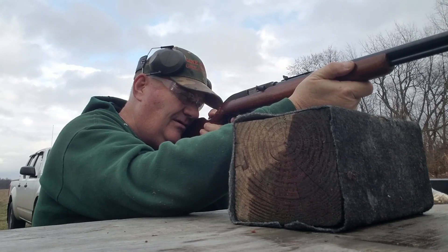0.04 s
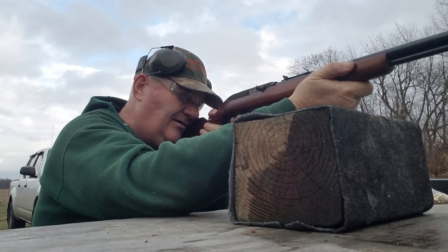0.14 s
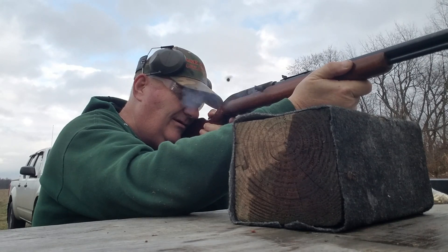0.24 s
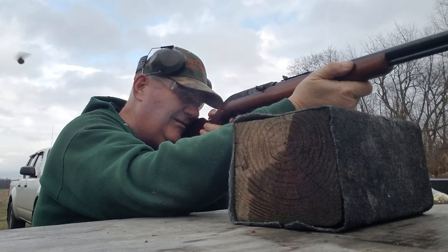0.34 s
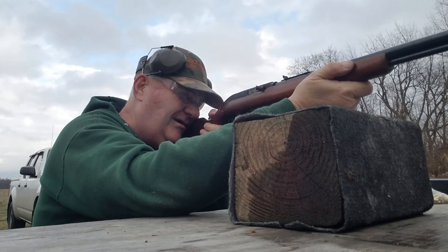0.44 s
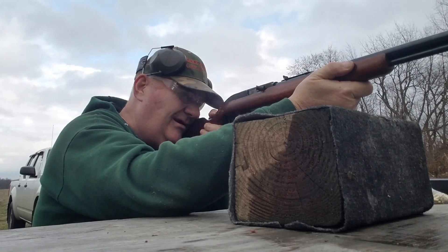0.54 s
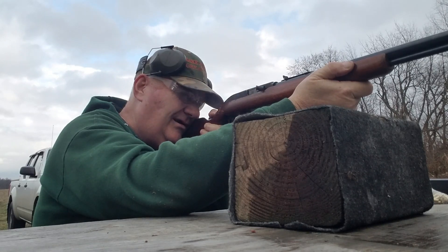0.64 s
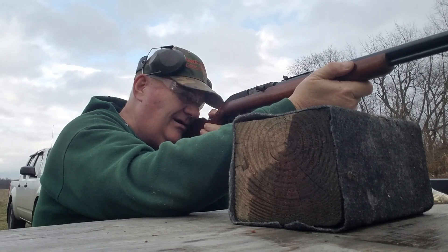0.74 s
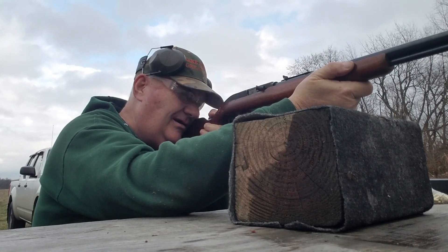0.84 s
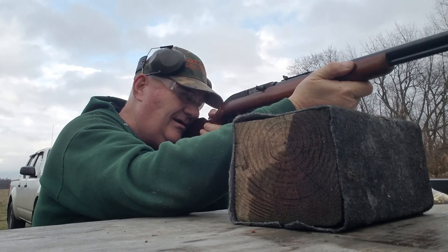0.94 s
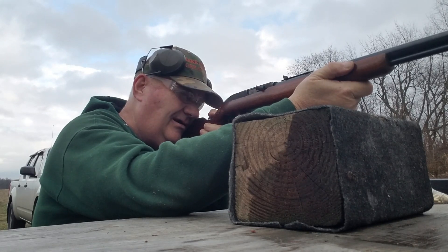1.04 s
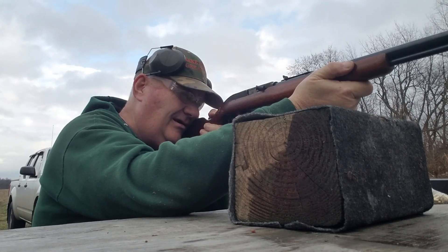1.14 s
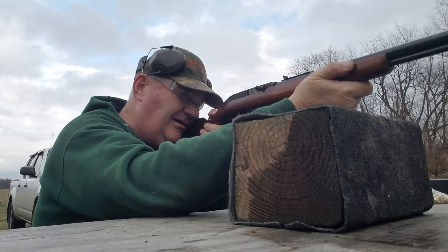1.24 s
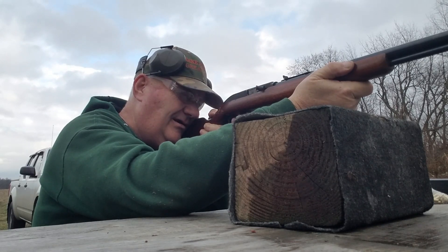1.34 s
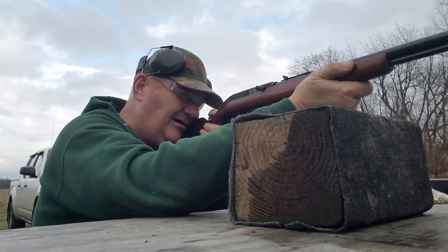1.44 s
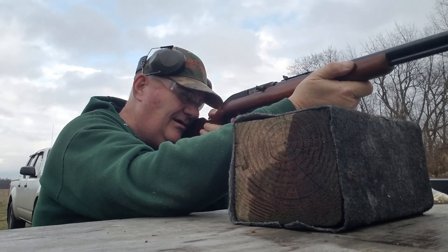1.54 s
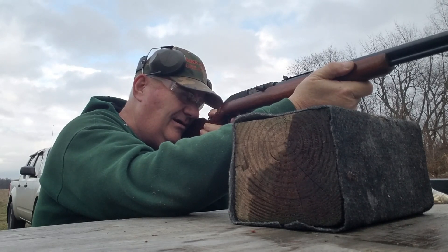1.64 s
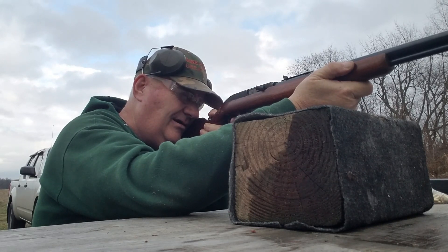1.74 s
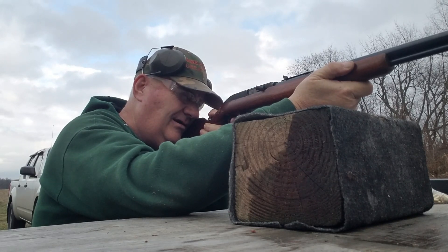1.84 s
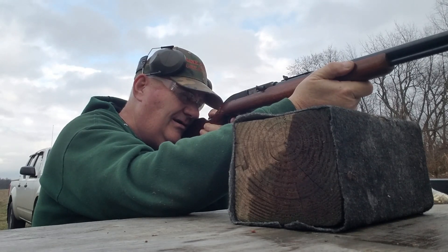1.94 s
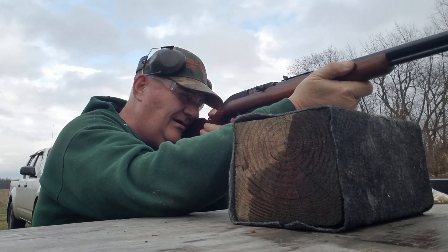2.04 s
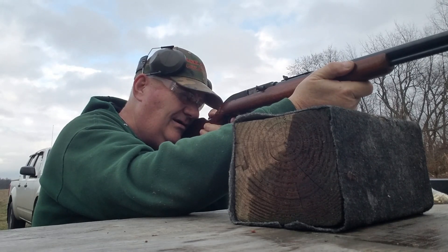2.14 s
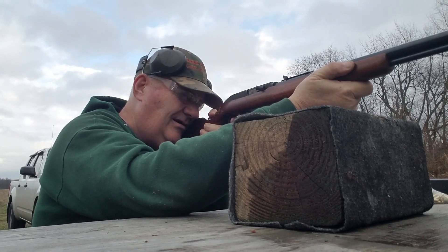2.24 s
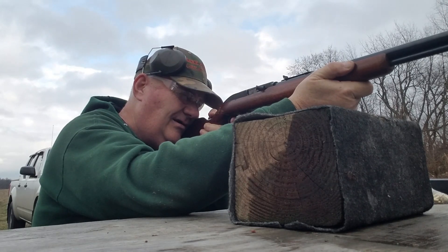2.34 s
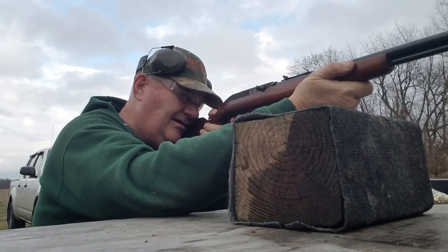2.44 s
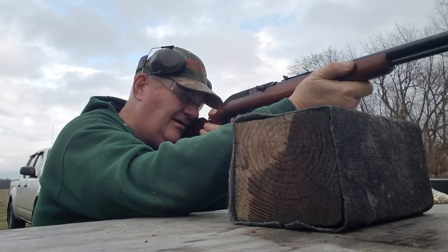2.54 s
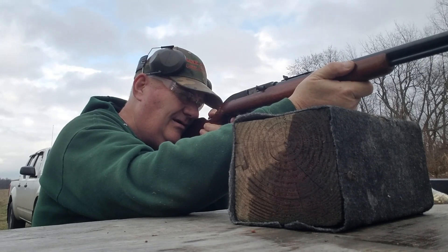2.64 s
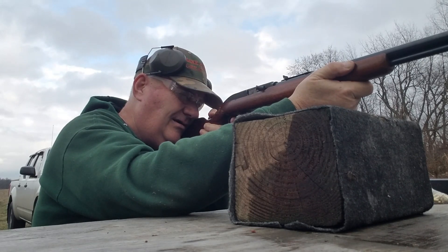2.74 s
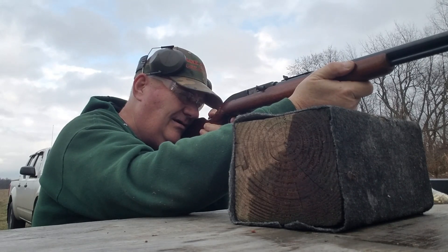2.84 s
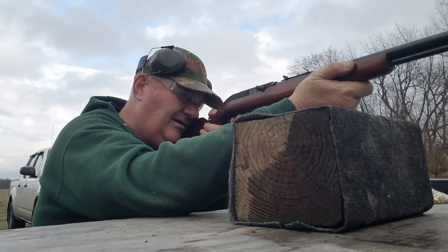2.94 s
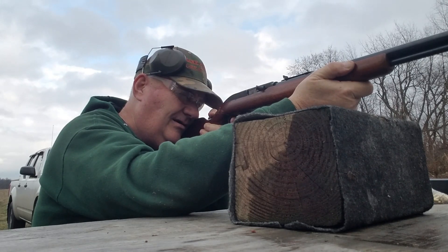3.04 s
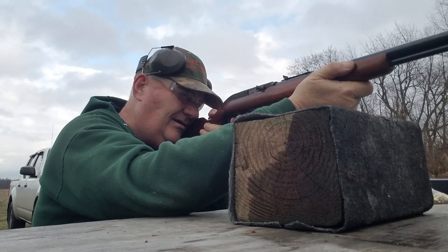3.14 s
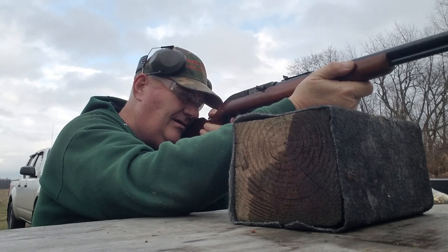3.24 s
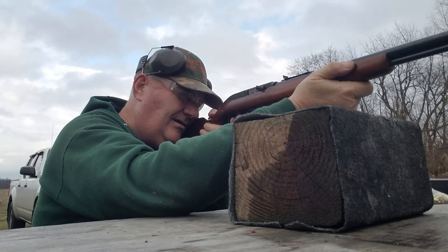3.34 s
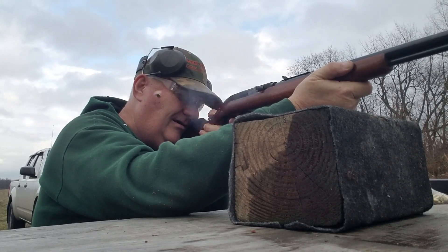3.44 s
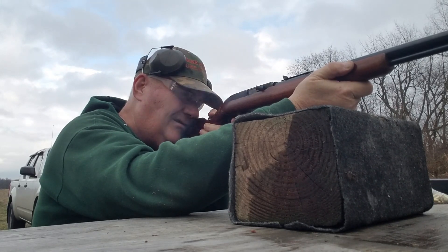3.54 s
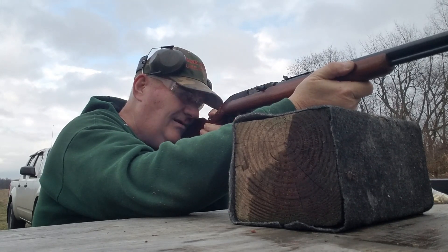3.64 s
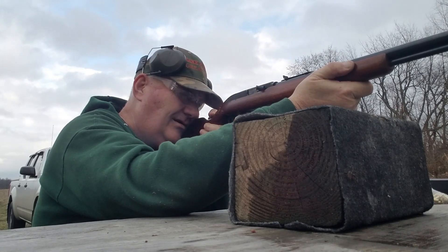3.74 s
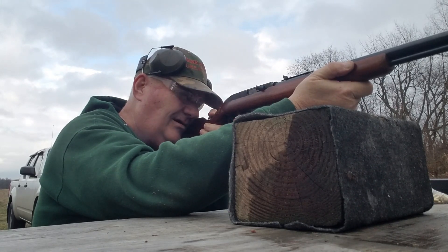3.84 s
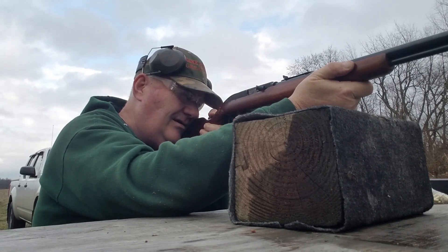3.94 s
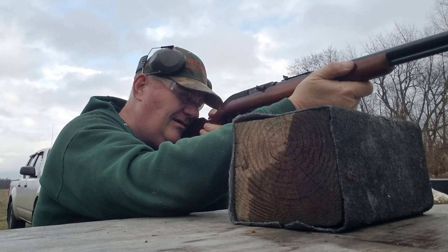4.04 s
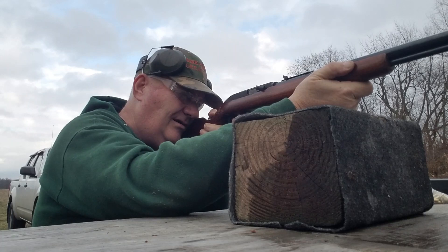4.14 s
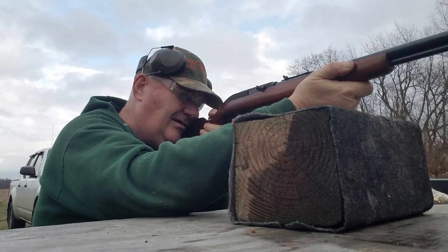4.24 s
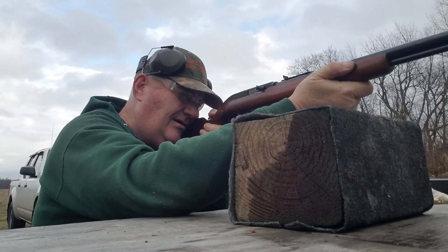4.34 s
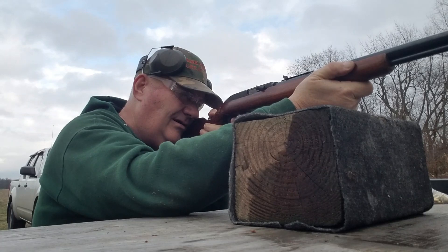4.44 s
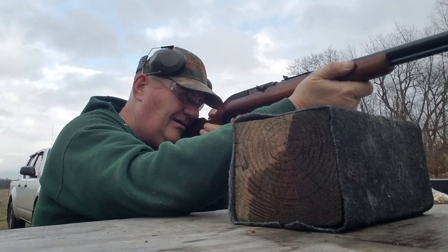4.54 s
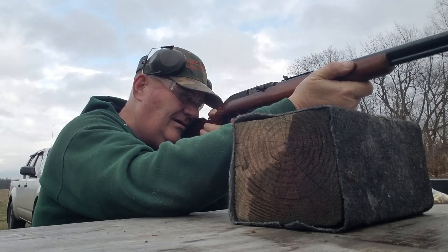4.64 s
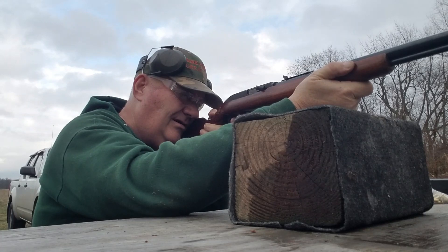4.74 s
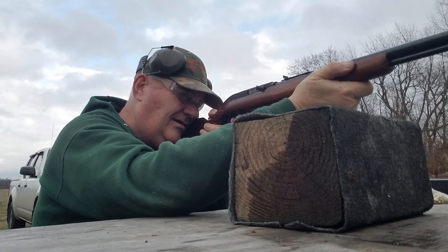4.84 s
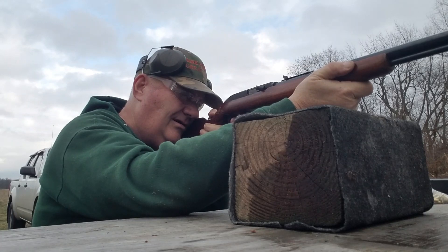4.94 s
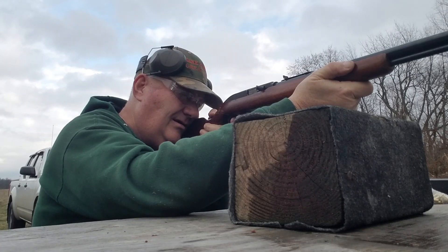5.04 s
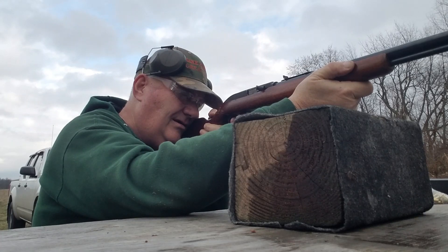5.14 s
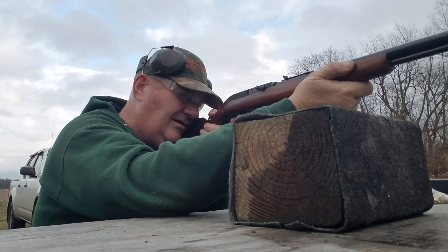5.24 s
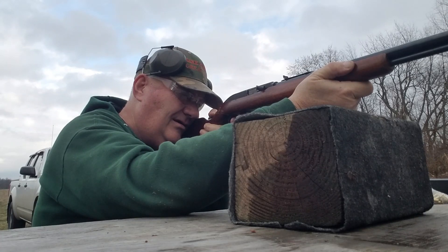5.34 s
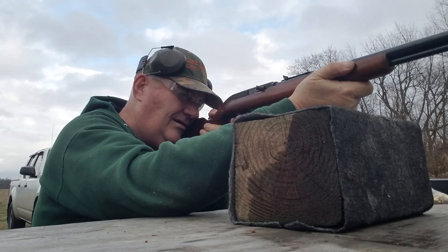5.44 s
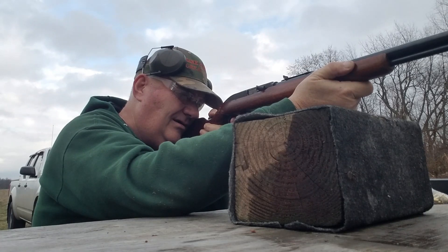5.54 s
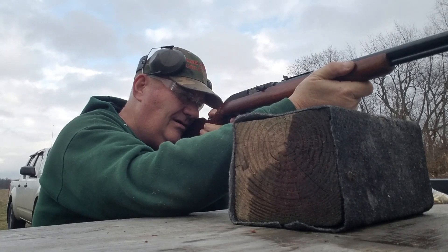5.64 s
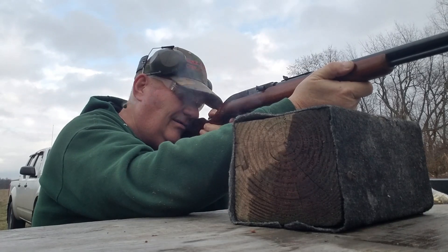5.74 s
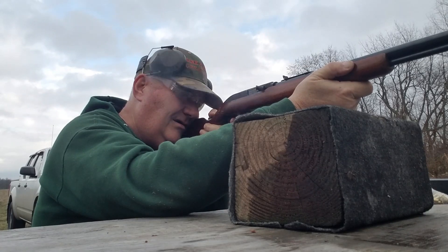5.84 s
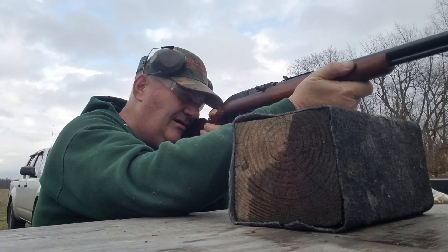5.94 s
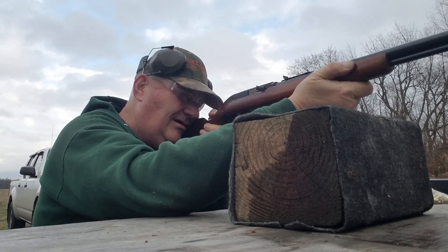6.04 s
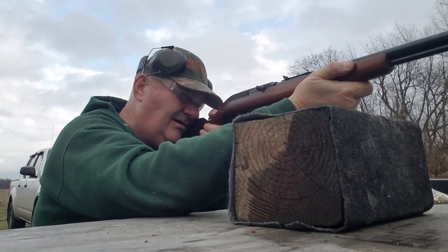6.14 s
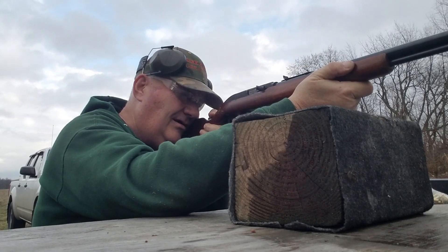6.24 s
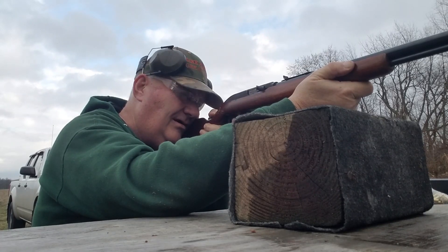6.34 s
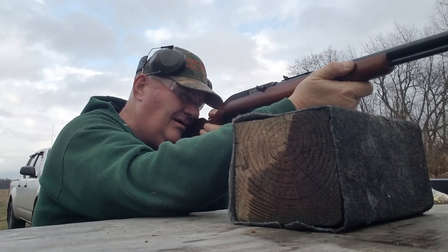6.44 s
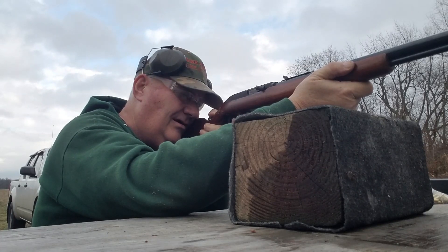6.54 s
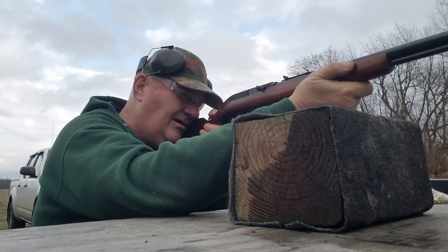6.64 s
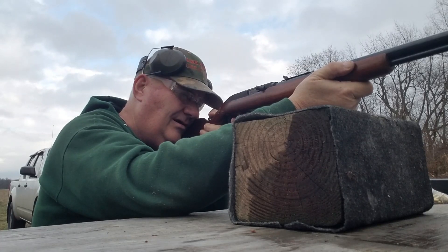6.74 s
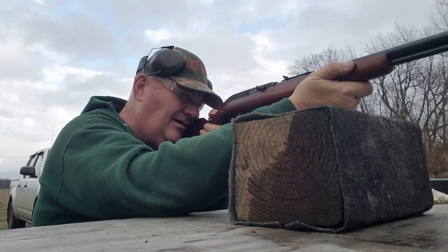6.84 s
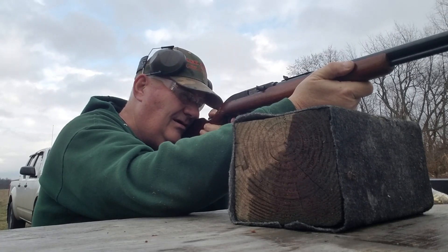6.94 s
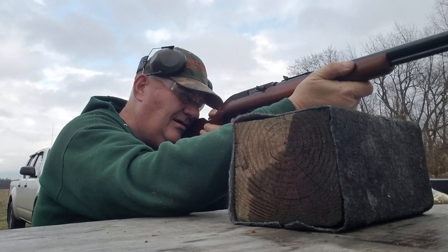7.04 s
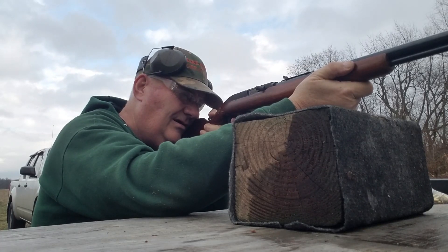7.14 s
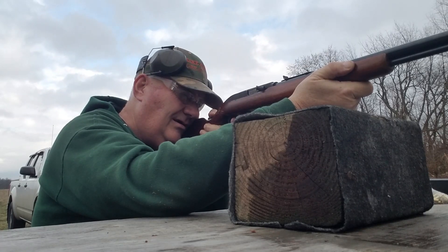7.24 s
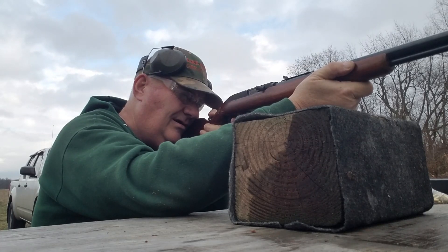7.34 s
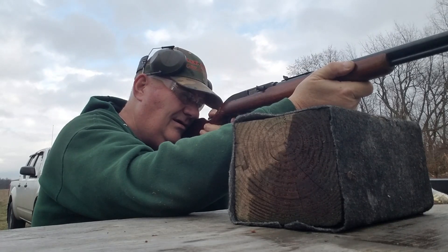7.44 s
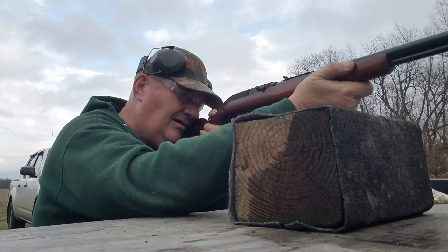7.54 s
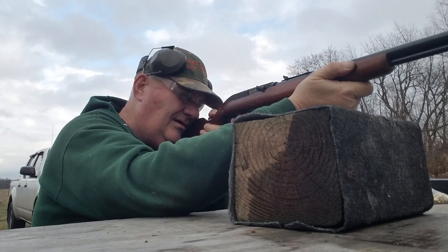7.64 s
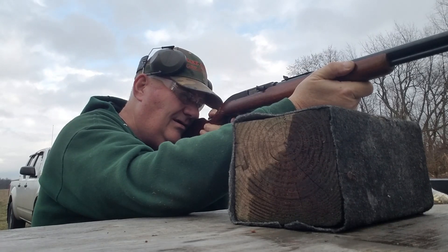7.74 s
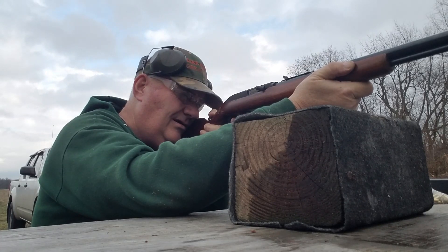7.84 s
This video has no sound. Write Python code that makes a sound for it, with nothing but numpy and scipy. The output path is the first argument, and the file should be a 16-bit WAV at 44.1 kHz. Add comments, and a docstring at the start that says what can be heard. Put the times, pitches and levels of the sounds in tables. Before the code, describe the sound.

Three spaced small-calibre rifle shots outdoors, each a harsh overloaded double crack with bolt clack, woodland echo and brass case ticking on a bench.

```python
"""Three rifle shots from a bench

A small-calibre self-loading rifle is fired in open country, close to two spaced microphones, which it overloads.
Blast, bolt clacks and the cracks that follow are shock fronts with dense pulse clusters, coloured by filters.
A wood answers with noise that dies away band by band; recoil sets off a decaying mode of the wooden bench.
The spent brass case bounces there as filtered contact noise and ringing modes. Filtered noise forms the
open-air floor, a gust of wind at the start and the low rumble of far traffic."""
import sys
import numpy as np
from scipy import signal
from scipy.fft import rfft, irfft
from scipy.io import wavfile

SR = 44100
rng = np.random.default_rng(int(sys.argv[2]) if len(sys.argv) > 2 else 0)


def generate_wav(signal):
    """Clip the signal to [-1, 1] and save it as 16-bit WAV at the path in sys.argv[1]."""
    frames = np.transpose(np.atleast_2d(signal))
    scaled = np.clip(frames, -1, 1) * 32767
    pcm = np.round(scaled).astype(np.int16)
    wavfile.write(sys.argv[1], SR, pcm)


N = 348390   # samples

# The three shots, all levels ahead of the gain control. near_decay_factor stretches the decay of the near trees.
# start_s, blast_db, extra_bass_db, blast_held_ms, bench_thump_db, wash_db, wash_treble_db, near_decay_factor
SHOTS = [(0.2629, -2, 7, 8.5, -16, -25, -2.5, 1.03), (3.4031, -2.5, -7, 6.6, -32, -24.5, 1, 1.05),
         (5.6762, -4, -6.5, 10, -27, -26.5, 2, .9)]
LEFT_LEADS = 20   # samples by which shared sound reaches the left microphone first
BASS_PAN_DB = -4.5   # left-right; the bench carries the thump to the right microphone
GRID = 8192   # samples in the FFT
EDGES = np.append(20 * 2 ** np.arange(0, 9.6, 1 / 3), 17000)   # Hz, third octaves below the top band
CENTRES = np.sqrt(EDGES[1:] * EDGES[:-1])
BANDS = [signal.butter(2, pair, "band", fs=SR, output="sos") for pair in zip(EDGES, EDGES[1:])]


def from_db(db):
    """Convert a level in decibels to an amplitude ratio."""
    return 10 ** (np.asarray(db) / 20)


def rms_one(x):
    """Normalise the mean power to 1."""
    return x / np.sqrt(np.mean(x ** 2) + 1e-20)


def at_hz(points, hz):
    """Interpolate a spectrum linearly over log frequency."""
    point_hz, value = np.array(points).T
    return np.interp(np.log(hz), np.log(point_hz), value)


def in_time(rows, s):
    """Interpolate a curve linearly over time."""
    return np.interp(s, *np.transpose(rows))


def add(out, x, s):
    """Superpose x on out from time s onward."""
    i = round(s * SR)
    out[:, i:i + x.shape[1]] += x[:, :N - i]


def sides(db):
    """Split a left-right level difference evenly into two gains."""
    return from_db([[db / 2], [-db / 2]])


def resonance(x, hz, width_hz):
    """Resonate as a two-pole system of gain about 1 at its peak; the pole radius sets the bandwidth."""
    r = np.exp(-np.pi * width_hz / SR)
    zeros = np.array([1, 0, -1]) * (1 - r * r) / 2
    poles = [1, -2 * r * np.cos(2 * np.pi * hz / SR), r * r]
    return signal.lfilter(zeros, poles, x)


def drift(size, rate):
    """Fluctuate slowly along lines joining random values of spread 1, about two per cycle of the rate."""
    steps = rng.standard_normal(int(size / SR * rate * 2) + 2)
    return np.interp(np.linspace(0, len(steps) - 1, size), np.arange(len(steps)), steps)


def grains(size, spread_db):
    """Make impulsive white noise: three rows of rms 1 whose samples differ widely in size."""
    sizes = from_db(spread_db * np.minimum(rng.exponential(1, (3, size)), 6))
    return rms_one(sizes * rng.standard_normal((3, size)))


def stereo(three, alike):
    """Set the coherence of the sides: a shared row that leads on the left, plus an independent row per side."""
    shared = np.stack([three[0], np.roll(three[0], LEFT_LEADS)])
    alike = np.clip(alike, 0, 1)
    return np.sqrt(alike) * shared + np.sqrt(1 - alike) * three[1:]


def band_noise(size, spread_db, likeness):
    """Filter-bank synthesis: yield (centre Hz, stereo noise of equal power per Hz); neighbours are unrelated."""
    white = [grains(size, spread_db), grains(size, spread_db)]
    for k, (hz, band) in enumerate(zip(CENTRES, BANDS)):
        yield hz, stereo(signal.sosfilt(band, white[k % 2]), at_hz(likeness, hz))


def coloured(x, gain_db):
    """Minimum-phase filtering by the folded cepstrum: nothing sounds early, the bass is not delayed."""
    cepstrum = irfft(gain_db * np.log(10) / 20)
    cepstrum[:, 1:GRID // 2] *= 2
    cepstrum[:, GRID // 2 + 1:] = 0
    return irfft(rfft(x, GRID) * np.exp(rfft(cepstrum)))


def bursts(rows, colour, spread_db, alike, snap, rise_ms):
    """Impulsive radiation: a shock front and a dense cluster of pulses behind it, coloured afterwards."""
    out, ms = np.zeros((2, N)), np.arange(5000) / SR * 1000
    hz = np.maximum(np.arange(GRID // 2 + 1) * SR / GRID, 10)
    bass = np.clip(np.log2(500 / hz) / 2, 0, 1)   # grows below 500 Hz, full at 125 Hz
    treble = np.clip(np.log2(hz / 4000), 0, 1)   # grows above 4 kHz, full at 8 kHz
    front = np.where(ms < .25, 1 - ms / .125, 0)   # N-shaped pressure step
    fronts = np.stack([front, np.roll(front, LEFT_LEADS)])
    for s, level_db, bass_db, treble_db, pan_db, held_ms, t60_ms in rows:
        decay = from_db(-60 * np.maximum(ms - held_ms, 0) / t60_ms)
        shape = np.minimum(ms / rise_ms, 1) * decay
        pulses = stereo(grains(len(ms), spread_db), alike) * shape
        pulses += snap * fronts
        gain_db = at_hz(colour, hz) + bass * bass_db + treble * treble_db
        gain_db = gain_db - 10 * np.log10(np.mean(from_db(gain_db) ** 2))   # mean power gain 1
        gain_db = gain_db + np.array([[.5], [-.5]]) * (pan_db + BASS_PAN_DB * bass)
        add(out, coloured(pulses, gain_db) * from_db(level_db), s)
    return out


def after(start_s, rows, level_db, bass_db):
    """Shift a pattern of bursts in time, with added level and bass."""
    return [(start_s + s, level_db + db, bass_db + low_db, *rest) for s, db, low_db, *rest in rows]


def air_floor():
    """Stationary noise: the open-air floor is a sum of bands whose levels wander slightly."""
    # spectrum of the floor, relative: frequency_hz, density_db (per Hz)
    spectrum = [(20, -19.5), (40, -11.5), (60, -6.5), (90, 3), (120, 2), (170, -0.5), (340, 0), (480, -2),
                (960, 0), (1360, -7), (2700, -11), (5400, -19), (7700, -23), (11000, -19), (15000, -16.5)]
    # likeness of the two sides: frequency_hz, likeness (power share, 0 to 1)
    likeness = [(60, .93), (200, 1), (500, 0.29), (1500, .25), (4000, 0.014), (12000, .01)]
    floor = 0
    for hz, noise in band_noise(N, 0, likeness):
        floor = floor + noise * from_db(at_hz(spectrum, hz) + 1.2 * drift(N, 8.4))
    return from_db(-66.5) * rms_one(floor)


def traffic():
    """Narrow-band resonance: far traffic is noise passed twice through the same peak, throbbing as of an
    engine."""
    # level of the rumble: time_s, level_db
    level = [(0, -51.5), (.24, -58.5), (.5, -69), (1.3, -66.5), (2, -77), (2.6, -70.5), (3.3, -71),
             (4.6, -70.5), (5.5, -77), (6.8, -78), (7.9, -74.5)]
    hum_hz, width_hz, throb_hz, throb_depth = 88, 20, 15, 0.35
    t = np.arange(N) / SR
    far = stereo(rng.standard_normal((3, N + SR)), 0.94)
    once = resonance(far, hum_hz, width_hz)
    rumble = resonance(once, hum_hz, width_hz)[:, SR:]   # the first second lets the filters settle
    envelope = np.abs(signal.hilbert(rumble))
    rumble = rumble / (envelope + 0.37 * rumble.std())   # the hum wavers in pitch more than in level
    throb_phase = 2 * np.pi * throb_hz * t + 2.3 * drift(N, 3.4)
    rumble = rumble * (1 + throb_depth * np.sin(throb_phase))
    return from_db(in_time(level, t)) * rms_one(rumble)


def gust():
    """Turbulence: wind on the microphones is low noise, largely independent on the two sides."""
    # level of the gust: time_s, level_db
    level = [(0, -69), (.08, -63), (.16, -65), (.25, -62), (.5, -54), (.75, -64), (.95, -97)]
    # spectrum of the gust, relative: frequency_hz, density_db (per Hz)
    spectrum = [(20, -20.5), (50, -14.5), (100, -1.5), (160, 1), (300, -9), (600, -22), (1200, -44),
                (2500, -90.5)]
    out, t = np.zeros((2, N)), np.arange(SR) / SR
    bands = band_noise(SR, 0, [(60, 0.34), (1000, 0.33)])   # frequency_hz, likeness
    wind = sum(noise * from_db(at_hz(spectrum, hz)) for hz, noise in bands)
    add(out, from_db(in_time(level, t)) * rms_one(wind), 0)
    return out


def wash():
    """Diffuse scattering: echoes of countless trunks decay band by band, first near trees, then far woods."""
    # scatterers lie thicker at some distances: time_after_shot_s, level_db
    swell = [(0, -18), (.02, -9), (.07, -11), (.12, -3.5), (.2, 0), (.4, 3), (.6, -0.5), (.85, 2.5),
             (1.4, -3.5), (2.2, -1), (3, 8)]
    # likeness of the two sides: frequency_hz, likeness (power share, 0 to 1)
    likeness = [(60, .9), (300, 0.14), (1500, 0.78), (5000, 0.33), (12000, 0.093)]
    # balance of the two sides: frequency_hz, left_right_db
    balance = [(60, -1), (180, -2), (550, 0.5), (1650, 1), (4970, 2.5), (15000, -1)]
    # initial spectra, relative, of dull slow far woods and bright quick near trees: frequency_hz, density_db
    far_colour = [(60, -31), (250, -20), (400, -16.5), (550, -7.5), (850, 3.5), (1200, 0.5), (1700, 1),
                  (2200, -5.5), (2900, -9.5), (4200, -21), (6500, -36.5), (15000, -49.5)]
    near_colour = [(60, -15), (250, -9.5), (550, -3), (1000, -3.5), (1400, -2), (2000, 9), (2900, 3.5),
                   (4200, 1), (6500, -4.5), (8000, -4.5), (12000, -3), (15000, -4)]
    # decay time of the near trees ahead of each shot's factor: frequency_hz, t60_s
    near_t60 = [(60, 1), (500, 1), (4200, 1), (6500, 0.72), (12000, .65)]
    far_t60_s = 2.62
    out, t = np.zeros((2, N)), np.arange(3 * SR) / SR
    far_power = np.sum(from_db(at_hz(far_colour, CENTRES)) ** 2 * np.diff(EDGES))
    norm = np.sqrt(far_power / (SR / 2))
    for s, *_, level_db, treble_db, near_factor in SHOTS:
        # single near trees stand out in all bands at once
        lumps_db = 2.4 * np.exp(-t / .6) * drift(len(t), 90)
        echo = 0
        for hz, noise in band_noise(len(t), 4.0, likeness):
            far = from_db(at_hz(far_colour, hz) - 60 * t / far_t60_s)
            near_start_db = at_hz(near_colour, hz) + treble_db * (hz > 5000)
            near = from_db(near_start_db - 60 * t / (near_factor * at_hz(near_t60, hz)))
            flicker = from_db(1.5 * drift(len(t), 15))
            echo = echo + noise * np.hypot(far, near) * flicker * sides(at_hz(balance, hz))
        add(out, echo * from_db(level_db + lumps_db + in_time(swell, t)) / norm, s)
    return out


def case():
    """Impact excitation: each bounce is a bright tick, a knock of the wood and the thin ring of the brass tube."""
    # spent case on the bench; ring and knock are relative to the peak of the tick:
    # time_s, tick_peak_db, left_right_db, ring_db, knock_db
    bounces = [(0.7848, -33.5, -16, -29, -16), (1.2492, -33.5, -11, -26.5, -11.5),
               (1.474, -52, -18.5, -21, -20), (1.4814, -52, -20, -19, -20), (1.6399, -50, -9, -30, -20),
               (3.8565, -28, -5, -24, 6), (4.2155, -52, -5, -40, -20), (4.453, -43, -7, -50, -6),
               (4.5417, -36.5, 0, -50, 3), (4.7501, -74, 4, -50, 26), (6.1515, -27, -11, -25, -24),
               (6.2292, -41, -16, -30, -20), (6.4567, -33.5, -14, -28, -11), (6.5879, -43.5, -16, -23, -8),
               (6.6003, -41, -3, -34, -20), (6.6378, -52, -6, -19, -18)]
    # modes of the tube, mean levels relative to the ring: frequency_hz, level_db, t60_s
    modes = [(12000, 8, 0.1), (11990, -13.5, 0.16), (6950, -36, 0.082)]
    out, t = np.zeros((2, N)), np.arange(6000) / SR
    for s, peak_db, pan_db, ring_db, knock_db in bounces:
        contact = rng.standard_normal((2, len(t))) * np.exp(-t / 0.00037)
        tick = resonance(contact, hz=13600, width_hz=7900)
        knock = resonance(contact, hz=1930, width_hz=740)
        ring = 0
        for hz, db, t60_s in modes:
            decay = from_db(db + rng.normal(0, 2.8) - 60 * t / t60_s)   # strength varies with the bounce
            ring = ring + decay * np.sin(2 * np.pi * hz * t)
        hit = tick / np.abs(tick).max()
        hit = hit + from_db(knock_db) * knock / np.abs(knock).max()
        hit = hit + from_db(ring_db) * ring
        add(out, hit * from_db(peak_db) * sides(pan_db), s)
    return out


def thump():
    """Modal response: the recoil sets the bench's lowest mode going, a sine that decays exponentially."""
    mode_hz, rise_s, t60_s = 92, .008, .13
    out, t = np.zeros((2, N)), np.arange(SR // 4) / SR
    envelope = np.minimum(t / rise_s, 1) * from_db(-60 * t / t60_s)
    mode = envelope * np.sin(2 * np.pi * mode_hz * t)
    for s, _, _, _, thump_db, *_ in SHOTS:
        add(out, mode * from_db(thump_db) * sides(BASS_PAN_DB), s)
    return out


def later_cracks():
    """Impulse trains: a soft early crack, a loud second crack with followers and a late group follow each shot."""
    # second crack of each shot, and the late group behind it:
    # time_s, level_db, extra_bass_db, bite_db (3 to 4 kHz), late_level_db, late_extra_bass_db
    second_cracks = [(0.3427, -6, 1.5, -3, -14.5, 8.5), (3.485, -2.5, -0.5, -3, -16.5, -2),
                     (5.758, -3, -7.5, 4.5, -17, -12.5)]
    # patterns of the second crack with its followers, the early crack and the late group; level and bass add up:
    # time_after_start_s, level_db, bass_db, treble_db, left_right_db, held_ms, t60_ms
    second_crack_pattern = [(0, 0, -1.5, -3, 4, 4.1, 25), (.011, -16, 1.1, 0.1, -1.5, 2.5, 120),
                            (.0282, -11, -14, 4, -6, 2.0, 30)]
    early_pattern = [(0, -20.5, 0.76, 10, 2.5, 1.9, 12.6)]
    late_pattern = [(0, -1, 2.8, -7, 3.9, 7.1, 32), (.0053, -2.5, 0.76, -22, 5.4, 3.4, 58.7),
                    (0.0112, -5, 4, -5.5, 0.1, 3.1, 90)]
    # spectra of the cracks and of the late group, relative: frequency_hz, density_db (per Hz)
    crack_colour = [(30, -41.5), (60, -27.5), (250, -3), (700, -9.5), (1200, -7), (1700, -0.5),
                    (2500, -6.5), (3400, 4), (4400, -11), (5600, -9.5), (8000, -18.5), (11000, -12.5),
                    (15000, -14)]
    late_colour = [(30, -39), (60, -28), (300, -2), (700, -11), (1200, -9.5), (1900, 0.5), (2800, -5.5),
                   (4400, -11.5), (8000, -17.5), (15000, -14.5)]
    early_s, late_group_s = .0652, .0812   # after the shot, after the second crack
    cracks, late, out = [], [], 0
    for (shot_s, *_), row in zip(SHOTS, second_cracks):
        second_s, second_db, bass_db, bite_db, late_db, late_bass_db = row
        second, *followers = after(second_s, second_crack_pattern, second_db, bass_db)
        cracks += after(shot_s + early_s, early_pattern, 0, bass_db) + followers
        late += after(second_s + late_group_s, late_pattern, late_db, late_bass_db)
        second_colour = [(hz, db + bite_db * (3000 < hz < 4000)) for hz, db in crack_colour]
        out += bursts([second], second_colour, 5.2, 0.25, snap=1.6, rise_ms=0.24)
    out += bursts(cracks, crack_colour, 4.6, 0.27, snap=1.4, rise_ms=0.33)
    return out + bursts(late, late_colour, 6.1, 0.49, snap=1.1, rise_ms=0.49)


def bolt():
    """Mechanical impact: each cycle of the bolt is a fixed pattern of short clacks after the shot."""
    # one cycle of the bolt, its bass added to by the shot:
    # time_after_shot_s, level_db, bass_db, treble_db, left_right_db, held_ms, t60_ms
    cycle = [(.012, -12.5, -3, -4, 4.5, 2.3, 13), (.0203, -5, -7, 3, 4, 2.7, 25),
             (.032, -21, -4.5, -0.55, 2.5, 3.6, 23), (.0387, -13, -2, -1, -0.5, 2.3, 32)]
    # spectrum of the clacks, relative: frequency_hz, density_db (per Hz)
    colour = [(30, -32), (60, -8.5), (125, -0.5), (300, -4), (900, -1), (1900, -6.5), (4400, -7.5),
              (7700, -16.5), (11000, -9.5), (14500, -8.5)]
    bass_share = .55   # how much of a shot's extra bass the bolt carries
    clacks = []
    for s, _, bass_db, *_ in SHOTS:
        clacks += after(s, cycle, 0, bass_share * bass_db)
    return bursts(clacks, colour, 2.5, 0.22, snap=0.39, rise_ms=0.35)


def blast():
    """Shock radiation: each shot is a pressure step with a held, then decaying, cluster of pulses."""
    # spectrum of the blast, relative: frequency_hz, density_db (per Hz)
    colour = [(25, -17.5), (60, -10.5), (110, -2.5), (220, -8), (450, -2), (800, -1), (1400, 0.5),
              (2300, -5.5), (4000, -10.5), (7500, -17), (11000, -11.5), (15000, -8.5)]
    treble_db, pan_db, t60_ms = 0.6, 0.95, 26
    blasts = []
    for s, level_db, bass_db, held_ms, *_ in SHOTS:
        blasts.append((s, level_db, bass_db, treble_db, pan_db, held_ms, t60_ms))
    return bursts(blasts, colour, 3.2, 0.59, snap=.3, rise_ms=0.94)


def scene():
    """Superpose surroundings, echoes, case, bench, later cracks and rifle."""
    surroundings = air_floor() + traffic() + gust()
    rifle = bolt() + blast()
    return surroundings + wash() + case() + thump() + later_cracks() + rifle


def record(dry):
    """Gain control ducks after loud peaks and lets go slowly; overload is clipped, the top is cut."""
    most_db, above_db, release_db_s, smoothing_s = 9, -35, 41, .06
    offset = -.0004   # ahead of the ducking; the converter does not rest exactly at zero
    t = np.arange(N) / SR
    level_db = 20 * np.log10(np.minimum(np.abs(dry).max(axis=0), 1) + 1e-9)
    held_db = np.maximum.accumulate(level_db + release_db_s * t) - release_db_s * t   # falling peak hold
    r = np.exp(-1 / (smoothing_s * SR))
    duck_db = signal.lfilter([1 - r], [1, -r], np.clip(held_db - above_db, 0, most_db))
    clipped = np.clip((dry + offset) * from_db(-duck_db), -.95, .95)
    low_pass = signal.cheby2(12, 45, 16600, fs=SR, output="sos")   # 45 dB down from 16.6 kHz
    return np.clip(signal.sosfilt(low_pass, clipped), -1, 1)


dry = scene()
out = record(dry)
generate_wav(out)
```